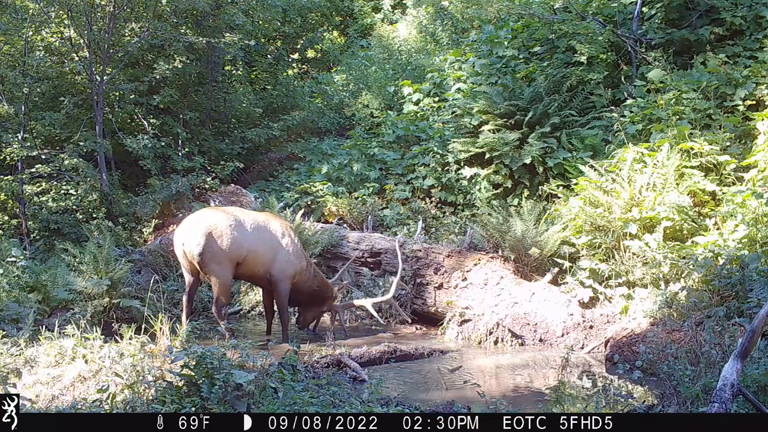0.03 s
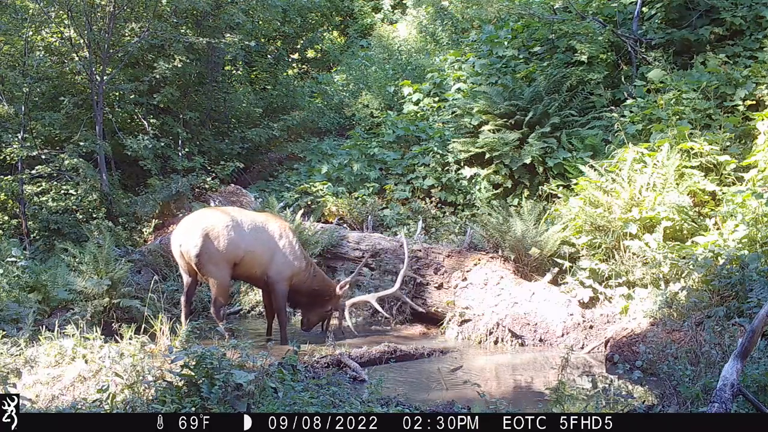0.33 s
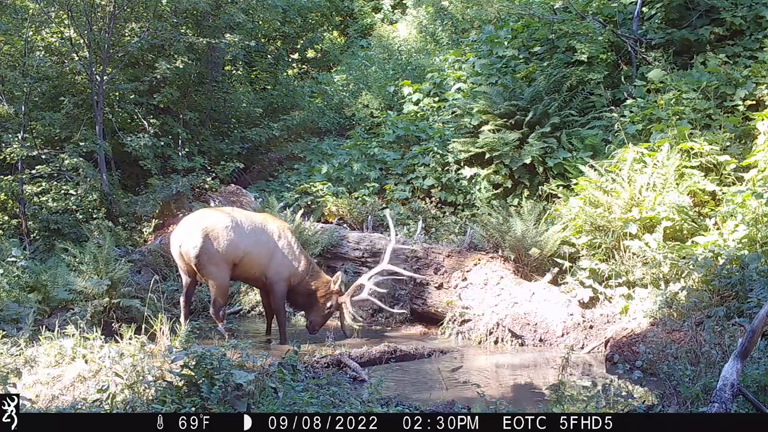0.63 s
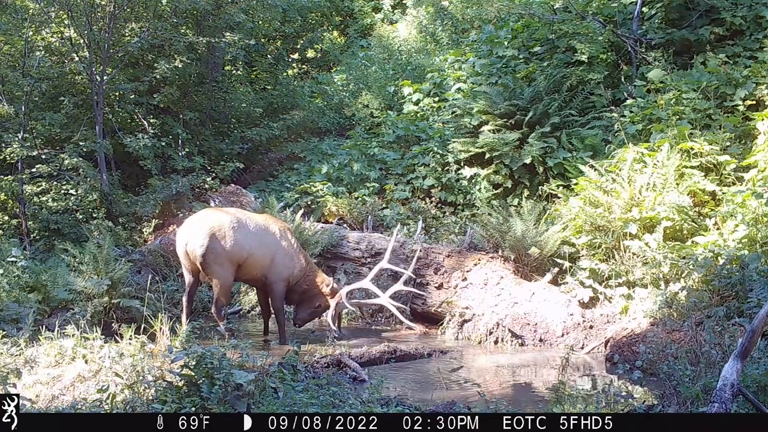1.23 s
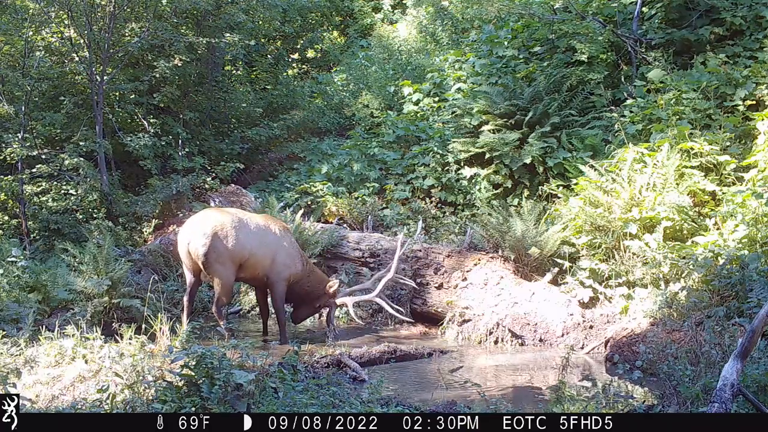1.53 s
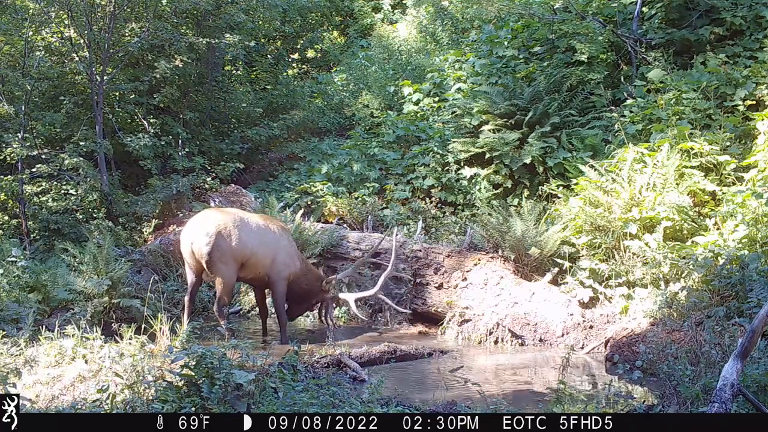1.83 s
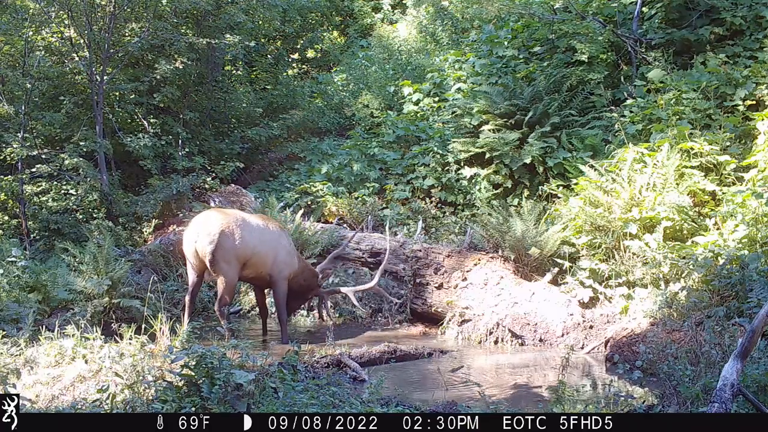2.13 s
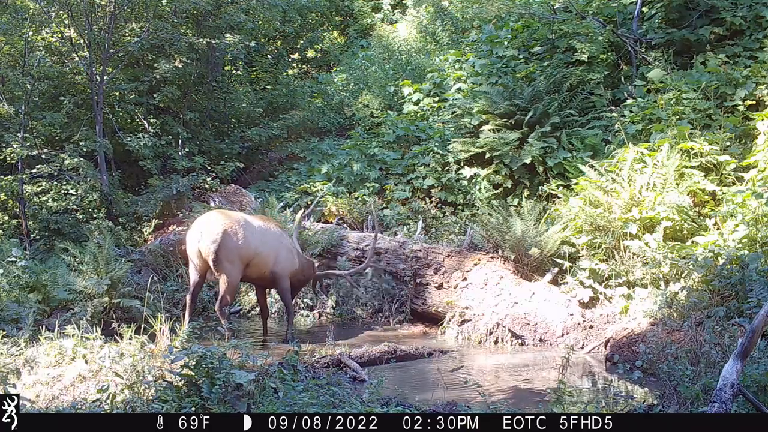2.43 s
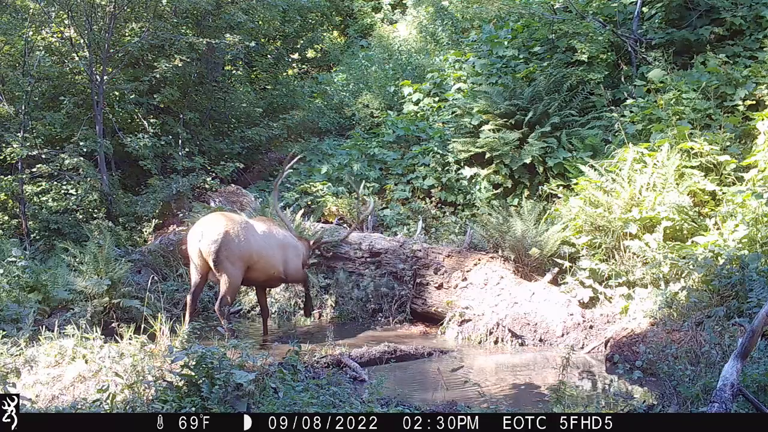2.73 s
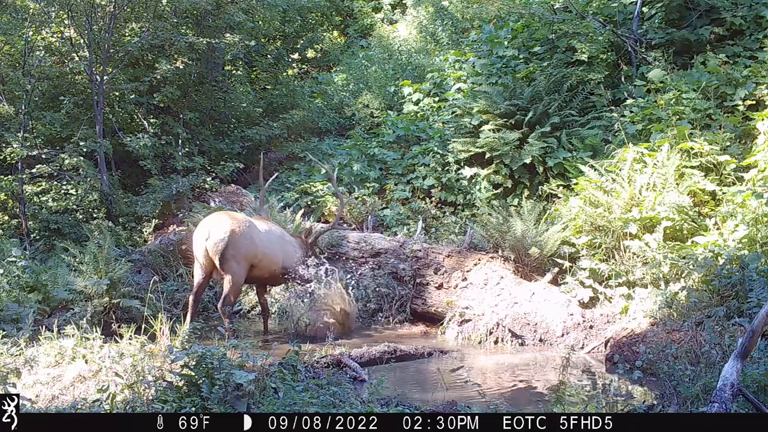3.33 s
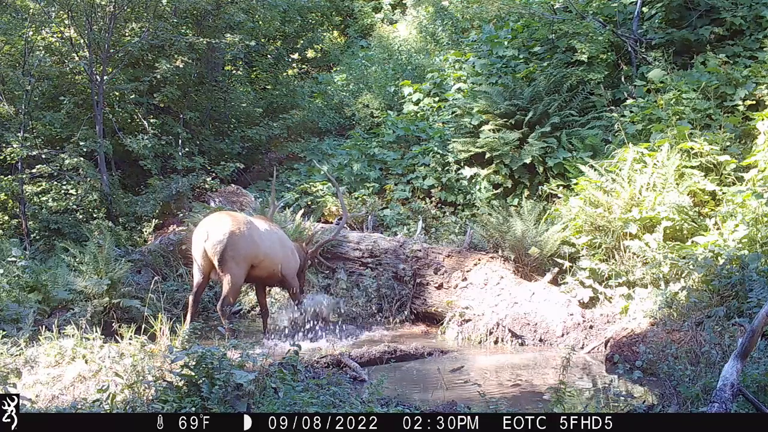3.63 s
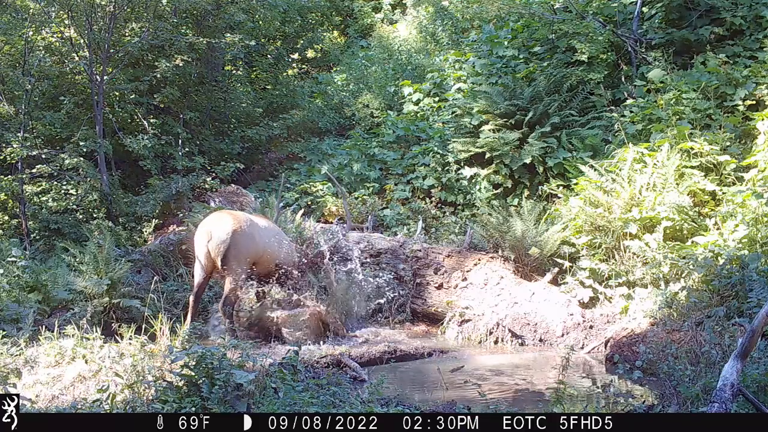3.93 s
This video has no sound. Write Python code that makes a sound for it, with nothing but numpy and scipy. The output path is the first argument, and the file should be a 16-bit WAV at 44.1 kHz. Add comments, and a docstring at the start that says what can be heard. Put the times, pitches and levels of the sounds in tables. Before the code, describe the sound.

Water splashes as a large animal works a shallow forest puddle: first quiet slaps and trickling drops, then one sharp stamp, gurgles and a louder patter of falling water, over the steady hiss of a thin-sounding microphone.

```python
"""A muddy forest wallow: an elk rakes it with its antlers, lifts them dripping, then stamps in a hoof.
Slaps burst into droplets, drops ring micro-bubbles, air pockets gulp and flung water showers back.
The splashing is coloured by a small boxed mono microphone that rings near 5 kHz.
Light wind nudges the microphone over its steady hiss."""
import sys
import numpy as np
from scipy import signal
from scipy.fft import rfft, irfft
from scipy.io import wavfile

SR = 44100
rng = np.random.default_rng(int(sys.argv[2]) if len(sys.argv) > 2 else 0)


def generate_wav(sig):
    """Save sig (samples, or channels by samples) to the path in sys.argv[1] as 16-bit PCM at SR."""
    pcm = np.round(np.clip(np.atleast_2d(sig).T, -1, 1) * 32767).astype(np.int16)
    wavfile.write(sys.argv[1], SR, pcm)


N = 176400

# flung water falling back: t/s, spray level/dB, churn level/dB
SHOWER = [(2.96, -54, -72), (3.04, -51.5, -64), (3.09, -55.5, -62), (3.16, -50.5, -58.5), (3.3, -54, -65),
          (3.38, -46.5, -69), (3.47, -42.5, -55.5), (3.58, -36.5, -49), (3.66, -39, -48),
          (3.73, -41.5, -53.5), (3.83, -44.5, -59), (3.9, -43, -54), (3.97, -39.5, -51), (4.0, -40.5, -52)]
# spectrum of churning water: f/Hz, level/dB
CHURN_SPECTRUM = [(120, -23), (250, -2.5), (700, 0.5), (950, -4.5), (1600, 0.5), (2600, -5), (8000, -55)]


def slaps():
    """Antler or hoof hits wet mud: a burst of droplets over a duller body of displaced water."""
    # t/s, burst level/dB, decay/s, body level/dB
    hits = [(0.219, -46, 0.022, -55.5), (0.504, -47.5, 0.011, -54), (0.529, -48.5, 0.0068, -65),
            (.716, -56, 0.02, -58.5), (1.012, -52.5, .016, -60), (2.11, -53, 0.032, -61),
            (2.86, -46, 0.011, -73), (2.893, -49, 0.031, -71), (2.939, -35, 0.0026, -53),
            (2.9423, -27.5, 0.0042, -38), (2.955, -29, 0.0023, -54), (2.96, -39, 0.013, -69),
            (3.028, -49, 0.017, -49.5), (3.316, -39.5, 0.0041, -56)]
    attack_s = .0005
    burst, body = np.zeros(N), np.zeros(N)
    t = np.arange(SR // 5) / SR
    for at, burst_db, decay_s, body_db in hits:
        shape = pulse(t, attack_s, decay_s)
        add(burst, at, undb(burst_db) * shape)
        add(body, at, undb(body_db) * shape)
    burst *= patter(per_s=12000, spread_db=1.5)
    body *= patter(per_s=8000, spread_db=0)
    return burst + colour(body, CHURN_SPECTRUM)


def hoof_crack():
    """The hoof breaks the surface with a bright crack."""
    # f/Hz, level/dB
    spectrum = [(1000, -15), (4000, -7), (8000, -4), (11500, -1), (16000, -16)]
    at_s, level_db, decay_s = 2.9405, -40.5, .0018
    out, t = np.zeros(N), np.arange(SR // 50) / SR
    add(out, at_s, undb(level_db) * np.exp(-t / decay_s) * rng.standard_normal(len(t)))
    return colour(out, spectrum)


def falling_water():
    """Droplets fall in bunches: off the antlers, then as a shower whose heavier blobs churn the pool."""
    # water and mud off the antlers: t/s, level/dB
    runoff = [(0, -57.5), (.03, -52.5), (.09, -59.5), (.14, -54.5), (.2, -59), (.26, -55.5), (.33, -60),
              (.55, -56.5), (.67, -62.5), (1.0, -65.5), (1.3, -62), (1.68, -66), (1.74, -54), (1.8, -59.5),
              (2.14, -53.5), (2.28, -57), (2.39, -50), (2.48, -60.5), (2.56, -56), (2.66, -63),
              (2.725, -51.5), (2.77, -62.5), (2.82, -51), (2.9, -59)]
    trickle = curve(runoff) * (patter(per_s=3000, spread_db=2.5) + undb(-17.5) * fizz())
    spray = curve(SHOWER) * (patter(per_s=5000, spread_db=2) + undb(-20) * fizz())
    blobs = curve(SHOWER, column=2) * patter(per_s=900, spread_db=3.5)
    bunching = undb(1.47 * jostle(clock()))
    return (trickle + spray + colour(blobs, CHURN_SPECTRUM)) * bunching


def drops():
    """Single drops hit the pool: a tiny splatter and a ringing micro-bubble each."""
    # t/s, splatter level/dB, ping level/dB, ping f/Hz
    impacts = [(.027, -51, -51, 4970), (.969, -55, -60, 5200), (1.084, -59, -53, 5800),
               (1.21, -53.5, -55, 4900), (1.215, -48, -57, 4950), (1.266, -50, -57, 5100),
               (1.43, -57, -55, 4900), (1.501, -58, -56, 4950), (1.516, -63, -55.5, 5050),
               (2.309, -43, -54, 5040), (2.521, -52, -50, 4750), (2.529, -52, -46, 3950),
               (2.607, -43, -47, 3250), (2.884, -52, -41, 5030), (2.972, -45, -42, 5050),
               (3.375, -40, -42, 4980), (3.6, -43, -40, 4950), (3.645, -39, -36.5, 4830),
               (3.695, -44, -40, 5000), (3.771, -43, -41.5, 5000), (3.946, -37, -45, 5000),
               (3.971, -35, -47, 4970)]
    out, t = np.zeros(N), np.arange(SR // 60) / SR
    shape = pulse(t, attack_s=.0011, decay_s=.0023)
    for at, splatter_db, ping_db, hz in impacts:
        add(out, at, undb(splatter_db) * shape * rng.standard_normal(len(t)))
        add(out, at, undb(ping_db) * ping(hz))
    return out


def bubbles():
    """Large air pockets gulp singly and tumble in the churned pool; small ones gurgle in clusters."""
    # pockets closing under water: t/s, f/Hz, level/dB, decay/s
    gulps = [(.878, 1160, -56.5, 0.0086), (3.027, 213, -47, 0.0067), (3.029, 1050, -49, 0.0079),
             (3.125, 205, -45.5, 0.008), (3.131, 340, -46, .0065), (3.135, 547, -46, 0.0075),
             (3.127, 1530, -50, .008), (3.575, 680, -49, .008), (3.594, 340, -49, 0.0078),
             (3.627, 255, -38.5, 0.0072)]
    # small-bubble clusters: t/s, length/s, level/dB
    gurgles = [(1.1, .03, -63), (2.555, 0.046, -57.5), (2.795, .03, -61), (3.15, 0.033, -57),
               (3.245, 0.048, -55), (3.38, 0.07, -60), (3.61, 0.18, -53), (3.985, 0.034, -51)]
    # f/Hz, level/dB
    gurgle_band = [(600, -26), (950, -3.5), (1120, -6.5), (1650, -6), (1900, -8.5), (3000, -34)]
    large = np.zeros(N)
    for at, hz, db, decay_s in gulps:
        add(large, at, undb(db) * bubble(hz, decay_s))
    tumbling = undb(-12.5) * curve(SHOWER, column=2) * swarm(centre_hz=400, spread_oct=.906, per_s=160)
    small = swarm(centre_hz=1314, spread_oct=.303, per_s=500)
    return large + tumbling + unit(colour(small, gurgle_band)) * swells(gurgles)


def swarm(centre_hz, spread_oct, per_s, decay_cycles=4.9):
    """Bubbles of random size and pitch; rms 1."""
    out = np.zeros(N)
    for when, pitch, size in rng.random((int(per_s * N / SR), 3)):
        hz = centre_hz * 2 ** (spread_oct * (2 * pitch - 1))
        add(out, when * N / SR, undb(10 * size) * bubble(hz, decay_cycles / hz))
    return unit(out)


def bubble(hz, decay_s):
    """A ringing air pocket: its pitch rises as it fades and wavers as it changes shape."""
    rise_per_decay, wobble, attack_s = .07, .045, .0024
    t = np.arange(SR // 12) / SR
    pitch_ratio = 1 + rise_per_decay * t / decay_s + wobble * jostle(t)
    phase = 2 * np.pi * hz * np.cumsum(pitch_ratio) / SR
    return 2 * (1 - np.exp(-t / attack_s)) * np.exp(-t / decay_s) * np.sin(phase)


def patter(per_s, spread_db):
    """Random droplet clicks, the large ones rare; rms 1."""
    size = undb(spread_db * np.minimum(rng.exponential(size=N), 5))
    hits = rng.random(N) < per_s / SR
    return unit(hits * size * np.sign(rng.standard_normal(N)))


def fizz(per_s=300, centre_hz=5054, spread_oct=.052, spread_db=5):
    """Micro-bubbles ringing at random; rms 1."""
    out = np.zeros(N)
    for when, pitch, size in rng.random((int(per_s * N / SR), 3)):
        hz = centre_hz * 2 ** (spread_oct * (2 * pitch - 1))
        level_db = -spread_db * np.log(size + .036)
        add(out, when * N / SR, undb(level_db) * ping(hz))
    return unit(out)


def ping(hz):
    """A micro-bubble rings for a few cycles."""
    t = np.arange(SR // 80) / SR
    return pulse(t, attack_s=.00073, decay_s=.00093) * np.sin(2 * np.pi * hz * t)


def jostle(t, knots_per_s=90):
    """Smooth random motion of the water."""
    knots = rng.standard_normal(1000)
    return np.interp(t * knots_per_s, np.arange(len(knots)), knots)


def forest(x, tail_db=-17, attack_s=.0017, decay_s=.05):
    """Bank and foliage scatter a short, faint tail."""
    t = np.arange(SR // 2) / SR
    tail = rng.standard_normal(len(t)) * pulse(t, attack_s, decay_s)
    return x + undb(tail_db) * signal.fftconvolve(x, tail / np.linalg.norm(tail))[:N]


def wind():
    """Wind on the microphone: rumbling gusts, and puffs that push and pull once."""
    # f/Hz, level/dB
    spectrum = [(10, -13.5), (30, 1), (95, -9.5), (200, -21), (800, -60)]
    # t/s, length/s, level/dB
    gusts = [(.2, 0.28, -61), (.6, 0.064, -61.5), (.76, .06, -66), (1.08, 0.1, -62.5), (1.83, 0.1, -57),
             (1.92, 0.1, -54), (3.25, 0.08, -61.5)]
    # t/s, half width/s, peak level/dB
    puffs = [(0.1167, 0.0015, -38.5), (.322, 0.0021, -54), (0.341, 0.0013, -47.5), (1.82, 0.0025, -47),
             (1.931, 0.0019, -43)]
    out = unit(colour(rng.standard_normal(N), spectrum)) * swells(gusts)
    for at, half_width_s, db in puffs:
        u = (clock() - at) / half_width_s
        out -= undb(db) * u * np.exp((1 - u ** 2) / 2)
    return out


def hiss(level_db=-56.5):
    """Steady microphone noise."""
    # f/Hz, level/dB
    spectrum = [(15, -41), (25, 4), (101, -1), (160, -4), (230, -3), (400, -5.5), (1500, -9), (15500, -9.5)]
    return undb(level_db) * unit(colour(rng.standard_normal(N), spectrum))


def undb(db):
    return 10 ** (np.asarray(db) / 20)


def unit(x):
    """Scale to rms 1."""
    return x / np.sqrt(np.mean(x ** 2) + 1e-20)


def clock():
    return np.arange(N) / SR


def pulse(t, attack_s, decay_s):
    """Exponential rise and decay; peak 1."""
    shape = (1 - np.exp(-t / attack_s)) * np.exp(-t / decay_s)
    return shape / shape.max()


def curve(rows, column=1):
    """Gain along one dB column of a table, silent outside its time span."""
    rows = np.array(rows)
    return undb(np.interp(clock(), rows[:, 0], rows[:, column], left=-120, right=-120))


def swells(rows):
    """Gain of bell-shaped swells: t/s, length/s, level/dB."""
    return sum(undb(db) * np.exp(-2 * ((clock() - at) / length_s) ** 2) for at, length_s, db in rows)


def colour(x, points, size=4096):
    """Minimum-phase filter through f/Hz, level/dB points; keeps the power of white noise."""
    hz, db = np.array(points).T
    bins_hz = np.arange(size // 2 + 1) * SR / size
    gain = undb(np.interp(np.log(bins_hz + 1), np.log(hz), db))
    cepstrum = irfft(np.log(gain))
    cepstrum[1:size // 2] *= 2
    cepstrum[size // 2 + 1:] = 0
    ring = irfft(np.exp(rfft(cepstrum)))
    return signal.fftconvolve(x, ring / np.linalg.norm(ring))[:N]


def add(out, at_s, x):
    """Mix a short sound in at a time."""
    i = int(np.clip(at_s * SR, 0, N - 1))
    out[i:i + len(x)] += x[:N - i]


def scene():
    """Water, wind and hiss, alike in both channels."""
    # boxed microphone response: f/Hz, level/dB
    mic_box = [(100, -22.5), (270, -16), (720, -15.5), (940, -21.5), (1150, -12), (1400, -11.5),
               (1650, -7.5), (1880, -17), (2350, -20), (2650, -9.5), (3050, -12.5), (3600, -8.5),
               (4250, -7), (4750, 0.9), (5150, 0.5), (5450, -4), (6450, -7), (7400, -6), (8250, -26),
               (9050, -20), (9600, -25), (10400, -23.5), (12000, -31.5), (16000, -36)]
    background = hiss() + wind()
    splashing = colour(falling_water() + slaps() + drops(), mic_box)
    mono = background + forest(splashing + bubbles() + hoof_crack())
    return np.array([mono, mono])


def record(dry, cutoff_hz=15780):
    """Steep elliptic low-pass."""
    return signal.sosfilt(signal.ellip(10, .2, 60, cutoff_hz, fs=SR, output="sos"), dry)


dry = scene()
out = record(dry)
generate_wav(out)
```